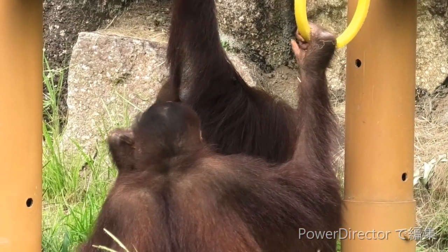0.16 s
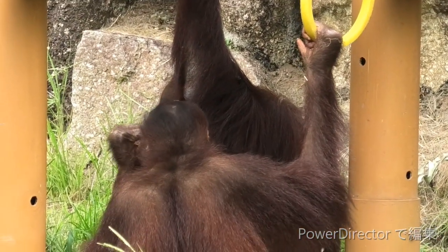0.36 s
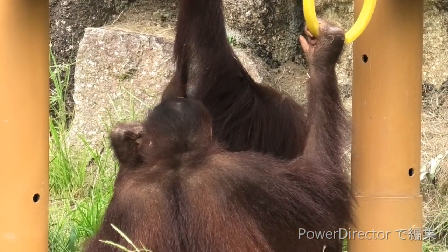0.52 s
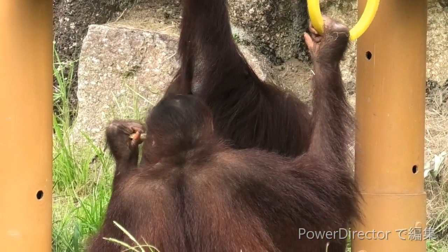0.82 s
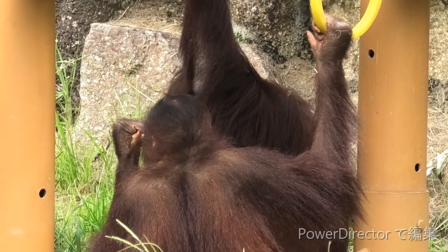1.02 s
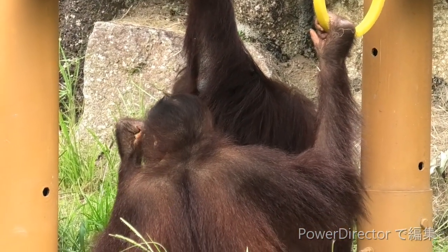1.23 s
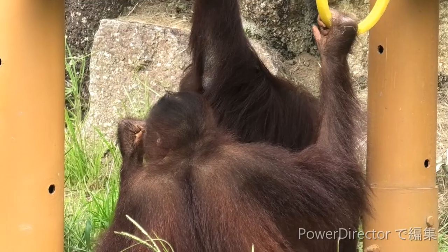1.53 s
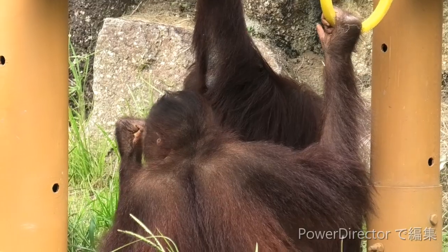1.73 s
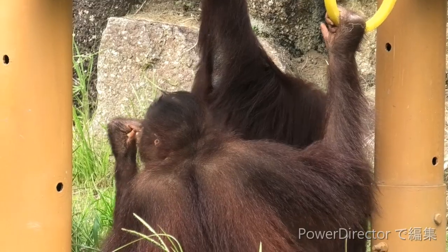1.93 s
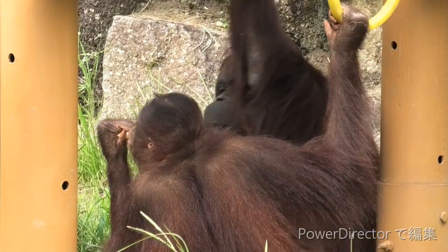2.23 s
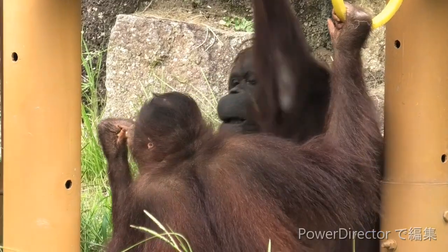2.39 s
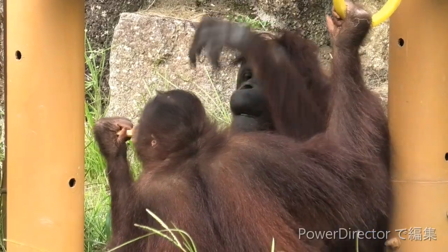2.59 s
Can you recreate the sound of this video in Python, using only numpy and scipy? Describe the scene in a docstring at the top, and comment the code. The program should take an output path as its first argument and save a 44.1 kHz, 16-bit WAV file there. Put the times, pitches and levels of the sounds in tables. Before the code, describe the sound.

Cicadas shrill in a steady, unbroken high-pitched buzzing chorus outdoors, over a faint low murmur

```python
"""A shrill cicada chorus is heard at once: two near insects buckle their tymbals about 380 and 395 times a
second, and each click train excites a body resonance; crowds of scattered click trains blur behind. Beneath lie
a low murmur of shaped noise with a faint hum, wind on the microphone as low-frequency noise, and faint rustles
and squeaks as gliding narrow noise bands. The camera body knocks and creaks in the hand and is bumped twice
with brief low thumps: short contacts ring damped modes, and each slip of the creak adds a snap of noise."""
import sys
import numpy as np
from scipy import signal
from scipy.fft import rfft, irfft
from scipy.io import wavfile
from scipy.ndimage import uniform_filter1d

SR = 44100
rng = np.random.default_rng(int(sys.argv[2]) if len(sys.argv) > 2 else 0)


def persist_wave(psi):
    """Save psi, clipped to +-1, as 16-bit WAV."""
    counts = np.round(np.clip(psi, -1, 1) * 32767).astype(np.int16)
    wavfile.write(sys.argv[1], SR, np.atleast_2d(counts).T)


N = 121275  # samples, 2.75 s


def undb(db):
    """Decibel law: amplitude ratio from dB."""
    return 10 ** (np.asarray(db) / 20)


def level(x, db):
    """Mean-square level: scale to an rms in dB, taken over all channels together."""
    return x * undb(db) / np.sqrt(np.mean(x ** 2))


def curve(points):
    """Linear interpolation through (t/s, value) points."""
    return np.interp(np.arange(N) / SR, *np.array(points).T)


def walk(rate):
    """Smoothed random fluctuation: values held 1 / rate s and averaged twice; spread near 1."""
    hold = max(int(SR / rate), 2)
    steps = np.repeat(rng.standard_normal(N // hold + 1), hold)
    slewed = uniform_filter1d(uniform_filter1d(steps, hold), hold)
    return 1.3 * slewed[:N]


def colour(x, points):
    """Spectral shaping: a gain through (f/Hz, level/dB) points on a logarithmic frequency axis."""
    hz, db = np.array(points).T
    bins = np.fft.rfftfreq(N, 1 / SR) + 1  # + 1 keeps the logarithm finite
    gain = undb(np.interp(np.log(bins), np.log(hz), db))
    return irfft(rfft(x) * gain, N)


def resonate(x, hz, width):
    """Resonance: the same second-order peak applied twice."""
    b, a = signal.iirpeak(hz, hz / width, fs=SR)
    once = signal.lfilter(b, a, x)
    return signal.lfilter(b, a, once)


def pan(x, db):
    """Interaural level difference: left over right by db."""
    return x * undb(np.array([[db], [-db]]) / 2)


def widen(mid, side, side_db):
    """Mid-side superposition: a shared part plus a part in opposition left and right."""
    return mid + undb(side_db) * side * np.array([[1], [-1]])


def strike(hits, modes, contact_s):
    """Modal synthesis: each hit builds up over the contact time and rings the same damped modes."""
    t, out = np.arange(N) / SR, np.zeros(N)
    for start, db in hits:
        age = np.maximum(t - start, 0)
        ring = np.zeros(N)
        for hz, mode_db, t60 in modes:
            decay = np.exp(-np.log(1000) * age / t60)
            ring += undb(mode_db) * np.sin(2 * np.pi * hz * age) * decay
        out += undb(db) * ring * (1 - np.exp(-age / contact_s))
    return out


def tymbals(rate, jitter_s, scatter_db, alternate):
    """Impulse train: a click per buckle, uneven in time and size; in and out strokes may alternate in sign."""
    turns = np.cumsum(rate) / SR + rng.random()
    k = np.arange(1, int(turns[-1]))
    time_chance, size_chance = rng.standard_normal((N // 20, 2))[k].T
    at = np.interp(k, turns, np.arange(N)) + jitter_s * SR * time_chance
    at = np.clip(at, 0, N - 1)
    size = undb(scatter_db * size_chance)
    if alternate:
        size = size * (-1.) ** k
    # a windowed sinc places each click between samples
    near = at.astype(int)[:, None] + np.arange(-5, 7)
    offset = near - at[:, None]
    shape = np.sinc(offset) * np.sinc(offset / 6)
    return np.bincount((near % N).ravel(), (size[:, None] * shape).ravel(), N)


# outdoor murmur, relative spectral density: f/Hz, level/dB [dB per Hz]
MURMUR_SPECTRUM = [(20, -9), (60, 0), (120, 0.5), (240, 0), (400, -4.5), (700, -10), (1000, -15),
                   (1450, -18), (2150, -11), (2700, -11.5), (3300, -15.5), (4500, -10), (9000, -54)]
# opposed part of the murmur, before its gain in widen: f/Hz, level/dB
MURMUR_OPPOSED = [(40, -7), (130, -9), (300, -5.5), (700, -1.5), (1500, 1), (3000, -2.5)]
MURMUR_DB, MURMUR_SWELL_DB = -42, .6  # rms before the swell, spread of the swell
HUM_HZ, HUM_DB = 264.2, -58


def murmur():
    """Partial coherence: low distant noise, most alike on both sides in the bass, with a faint wavering hum."""
    mid, side = rng.standard_normal((2, N))
    both = widen(mid, colour(side, MURMUR_OPPOSED), side_db=0.5)
    air = level(colour(both, MURMUR_SPECTRUM), MURMUR_DB) * undb(MURMUR_SWELL_DB * walk(7.5))
    hum_rate = HUM_HZ * (1 + 0.00763 * walk(9.94))
    hum = np.sin(2 * np.pi * np.cumsum(hum_rate) / SR) * undb(2.7 * walk(8.83))
    return air + level(hum, HUM_DB)


# course of the low buffeting, carrying also two brief low handling bumps near 0.93 s and 1.34 s: t/s, level/dB
WIND_COURSE = [(0, -79), (.55, -60), (.8, -42), (.89, -42), (.93, -31.5), (1.04, -41.5), (1.15, -35),
               (1.25, -53), (1.3, -45), (1.34, -29.5), (1.39, -48), (1.7, -57), (2.75, -70)]
# relative spectral density of the wind: f/Hz, level/dB [dB per Hz]
WIND_SPECTRUM = [(15, -32), (35, -2), (65, 2.5), (110, -12), (180, -12), (400, -39), (1000, -55)]


def wind():
    """Turbulent pressure: light low-frequency buffeting, incoherent between the two ports; the same low noise
    also carries two brief low thumps where the camera is bumped in the hand."""
    buffeting = colour(rng.standard_normal((2, N)), WIND_SPECTRUM)
    return level(buffeting, 0) * undb(curve(WIND_COURSE))


# faint rustles and squeaks: start t/s, length t/s, start f/Hz, end f/Hz, width f/Hz,
# level/dB [rms before the swell and the pan]
RUSTLE_BANDS = [(0.193, 0.043, 2030, 2030, 130, -45), (.53, 0.063, 1020, 1026, 90, -53),
                (1.02, 0.3, 1948, 2204, 500, -49.5), (1.167, .2, 2180, 2850, 700, -48.5),
                (2.08, 0.35, 1886, 1905, 110, -53.5)]


def rustles():
    """Quadrature modulation: narrow bands of friction noise that swell, glide and fade."""
    t, out = np.arange(N) / SR, 0
    for start, length, start_hz, end_hz, width, db in RUSTLE_BANDS:
        part = np.clip((t - start) / length, 0, 1)
        lowpass = signal.butter(2, width / 2, fs=SR, output="sos")
        grain = signal.sosfilt(lowpass, rng.standard_normal((2, 2, N)))
        phase = 2 * np.pi * np.cumsum(start_hz + (end_hz - start_hz) * part) / SR
        mid, side = grain[0] * np.cos(phase) + grain[1] * np.sin(phase)
        band = widen(mid, side, side_db=-3.5)
        out = out + level(band, db) * np.sin(np.pi * part)
    return pan(out, 4.9)


# knocks on the camera body: t/s, level/dB [strength before the modes]
CASE_KNOCKS = [(.1335, -29), (.1355, -14), (.1455, -21), (2.116, -29.5), (2.485, -41)]
# modes of the camera body: f/Hz, level/dB, t60/s
CASE_RESONANCES = [(660, -17, 0.036), (860, -6, 0.015), (1027, -1, 0.033), (1240, -14, 0.012),
                   (1750, -27, .012)]
# slips of one small creak: t/s, level/dB [strength before the modes]
CREAK_SLIPS = [(0.4317, -30), (0.4327, -26), (0.433, -22.5), (0.4354, -35)]
# modes of the creaking plastic: f/Hz, level/dB, t60/s
PLASTIC_RESONANCES = [(1100, -16, .012), (1663, -8, 0.018), (2590, -2.5, 0.0077), (2795, -0.5, 0.013),
                      (3800, -6.5, 0.0073)]


def handling():
    """Modal excitation: knocks rock the ports in opposition; a plastic joint slips a few times."""
    knocks = strike(CASE_KNOCKS, CASE_RESONANCES, contact_s=0.00034)
    rocking = knocks * np.array([[1], [-undb(-7.0)]])
    creak = strike(CREAK_SLIPS, PLASTIC_RESONANCES, contact_s=0.00053)
    return rocking + pan(creak, -1.1)


# dry snap of each slip, relative spectral density: f/Hz, level/dB [dB per Hz]
SNAP_SPECTRUM = [(600, -22), (2000, -13), (4500, 1), (7700, 1), (10500, -5), (12300, -6), (14200, 0),
                 (16000, -7)]
SNAP_DB, SNAP_S = 2, 0.0014  # noise level relative to the slip, decay time constant


def snaps():
    """Stick-slip release: a decaying millisecond burst of noise each time the joint lets go."""
    t, burst = np.arange(N) / SR, np.zeros(N)
    for start, db in CREAK_SLIPS:
        burst += undb(db) * (t > start) * np.exp(-np.abs(t - start) / SNAP_S)
    noise = widen(*rng.standard_normal((2, N)), side_db=-6)
    return level(colour(noise, SNAP_SPECTRUM), SNAP_DB) * burst


def crowd(spectrum, db, rate_hz, wander, jitter_s, scatter_s, side_db, count):
    """Multiple scattering: many click trains, each at its own rate and blurred by leaves and walls on its path."""
    t, both = np.arange(N // 32) / SR, 0
    for _ in range(count):
        rate = rate_hz * undb(rng.standard_normal()) * (1 + wander * walk(8))
        clicks = tymbals(rate, jitter_s, scatter_db=3, alternate=False) * undb(1.7 * walk(7.16))
        paths = rng.standard_normal((2, len(t))) * np.exp(-t / scatter_s)
        both = both + signal.fftconvolve(clicks[None], paths, axes=1)[:, :N]
    return level(colour(widen(*both, side_db), spectrum), db)


# the shrill crowd, relative spectral density: f/Hz, level/dB [dB per Hz]
SHRILL_SPECTRUM = [(6500, -30.5), (7250, -8.5), (7700, -2.5), (8100, -0.5), (8600, -1), (9000, -6),
                   (9350, -6), (9750, -22), (11000, -43)]
# the lower, sizzling crowd: f/Hz, level/dB [dB per Hz]
SIZZLE_SPECTRUM = [(3300, -36.5), (3950, -22), (4350, -10), (4900, -4), (5750, 0.5), (6700, -3),
                   (7400, -1.5), (9000, -21.5), (10000, -23.5)]
# thin top hiss of the chorus: f/Hz, level/dB [dB per Hz]
HISS_SPECTRUM = [(6000, -26), (8500, 6.5), (9800, 2.5), (11000, 1.5), (13500, 0.5), (15800, -1)]
SHRILL_DB, SIZZLE_DB, HISS_DB = -31.5, -32, -36.5  # rms before shimmer and pan


def chorus():
    """Superposition: a shrill crowd, a sizzling crowd and top hiss; the shrill and the hiss shimmer slightly."""
    shrill = crowd(SHRILL_SPECTRUM, SHRILL_DB, rate_hz=330, wander=.0015, jitter_s=.000014,
                   scatter_s=0.0038, side_db=-32, count=14)
    sizzle = crowd(SIZZLE_SPECTRUM, SIZZLE_DB, rate_hz=210, wander=.01, jitter_s=0.0002003,
                   scatter_s=0.0041, side_db=-11, count=12)
    noise = widen(*rng.standard_normal((2, N)), side_db=-1.5)
    hiss = level(colour(noise, HISS_SPECTRUM), HISS_DB) * undb(0.35 * walk(12))
    return pan(shrill * undb(0.57 * walk(25.06)), 0.93) + sizzle + pan(hiss, 1.0)


# click rates of the two near insects, before a slight wander: t/s, f/Hz [clicks per s]
BUZZER_CLICKS = [(0, 381.2), (.5, 378.6), (1.3, 379.9), (1.8, 379.1), (2.75, 378.7)]
WHINER_CLICKS = [(0, 395.8), (.45, 393.8), (1.1, 395.8), (1.9, 395.1), (2.75, 395.1)]
RATE_WANDER, CLICK_JITTER_S = .001, .00001  # fraction of the rate, s
# resonances of the hollow abdomens: centre Hz, width Hz of each peak pass, rms dB before the pan
BUZZER_HZ, BUZZER_WIDTH_HZ, BUZZER_DB = 8600, 800, -38
WHINER_HZ, WHINER_WIDTH_HZ, WHINER_DB = 8850, 340, -41
WHINER_LOW_HZ, WHINER_LOW_WIDTH_HZ, WHINER_LOW_DB = 7550, 1000, -44
BUZZER_PAN_DB, WHINER_PAN_DB = 2.5, 4.5  # left over right


def near_cicadas():
    """Forced resonance: steady clicks ring each hollow abdomen, whose main resonance swells and fades a little."""
    buzz_rate = curve(BUZZER_CLICKS) * (1 + RATE_WANDER * walk(14))
    whine_rate = curve(WHINER_CLICKS) * (1 + RATE_WANDER * walk(14))
    buzz = tymbals(buzz_rate, CLICK_JITTER_S, scatter_db=0.5, alternate=False)
    whine = tymbals(whine_rate, CLICK_JITTER_S, scatter_db=0.5, alternate=True)
    buzzer = resonate(buzz, BUZZER_HZ, BUZZER_WIDTH_HZ) * undb(2.6 * walk(5.04))
    whiner = resonate(whine, WHINER_HZ, WHINER_WIDTH_HZ) * undb(2.2 * walk(6))
    whiner_low = resonate(whine, WHINER_LOW_HZ, WHINER_LOW_WIDTH_HZ)  # steady and central
    left_leaning = pan(level(buzzer, BUZZER_DB), BUZZER_PAN_DB) + pan(level(whiner, WHINER_DB), WHINER_PAN_DB)
    return left_leaning + level(whiner_low, WHINER_LOW_DB)


def scene():
    """Linear superposition of all sources, from the background to the near insects."""
    background = murmur() + wind() + rustles()
    camera = handling() + snaps()
    return background + camera + chorus() + near_cicadas()


def record(dry):
    """Low-pass filtering: the recorder cuts the top steeply above 15.8 kHz."""
    lowpass = signal.ellip(12, .1, 80, 15800, fs=SR, output="sos")
    return signal.sosfilt(lowpass, dry)


dry = scene()
out = record(dry)
persist_wave(out)
```